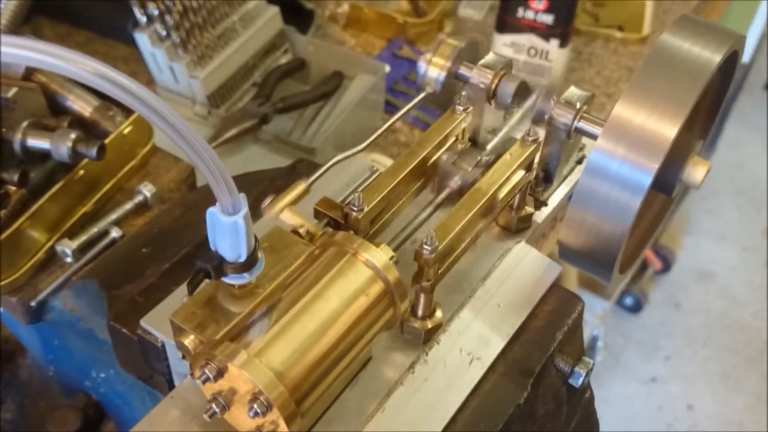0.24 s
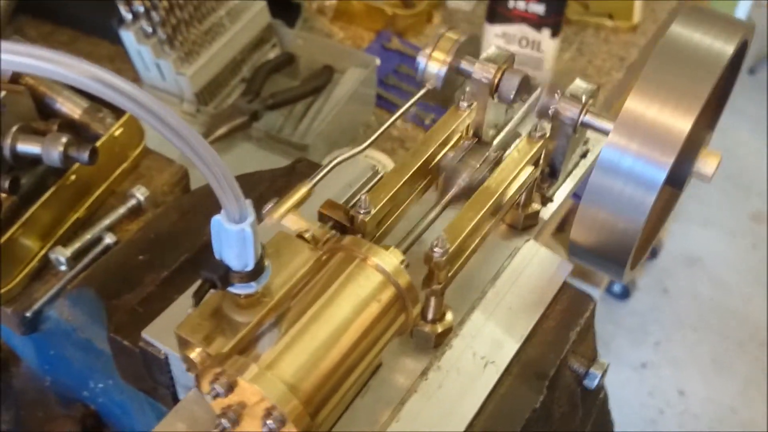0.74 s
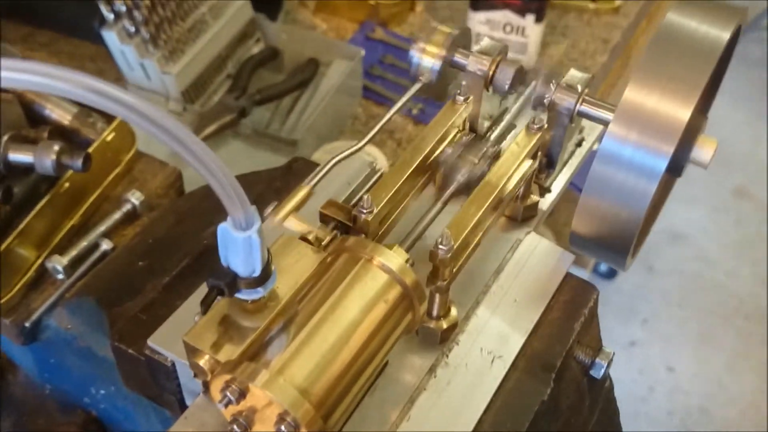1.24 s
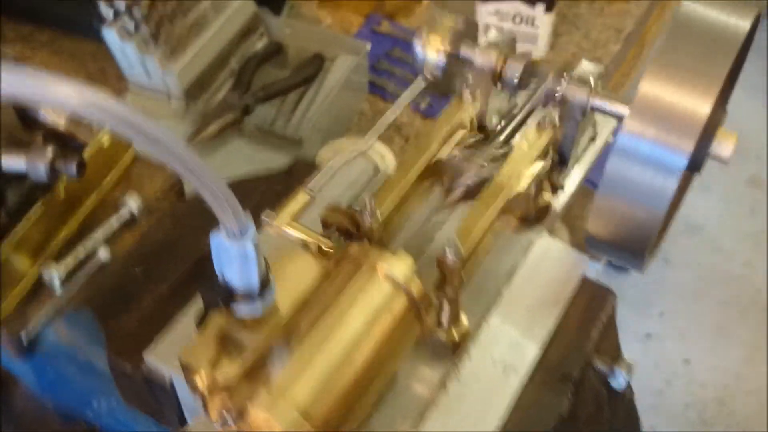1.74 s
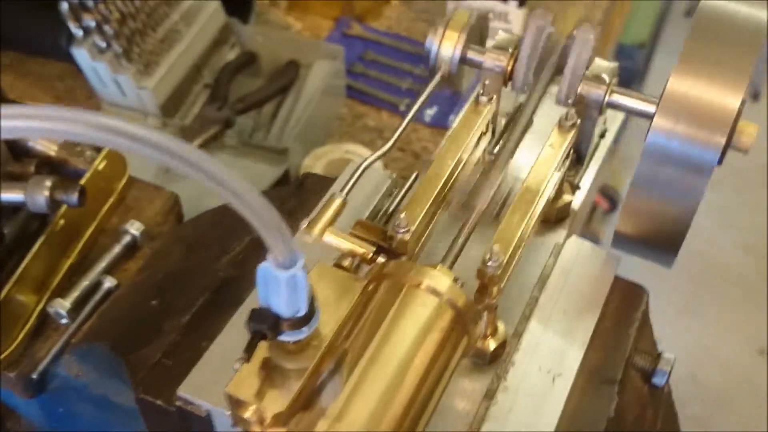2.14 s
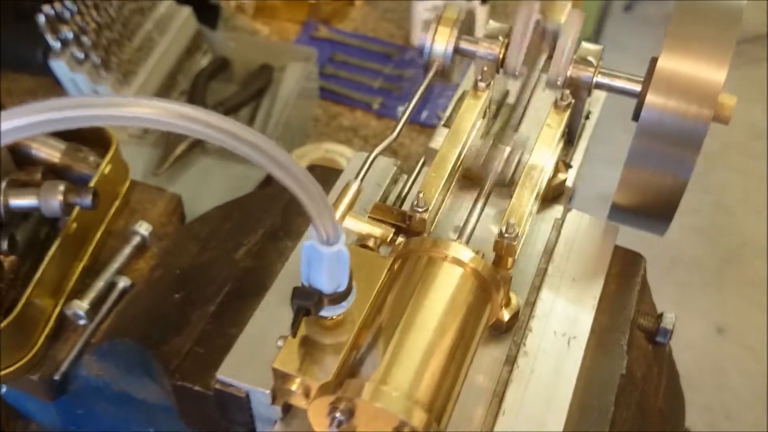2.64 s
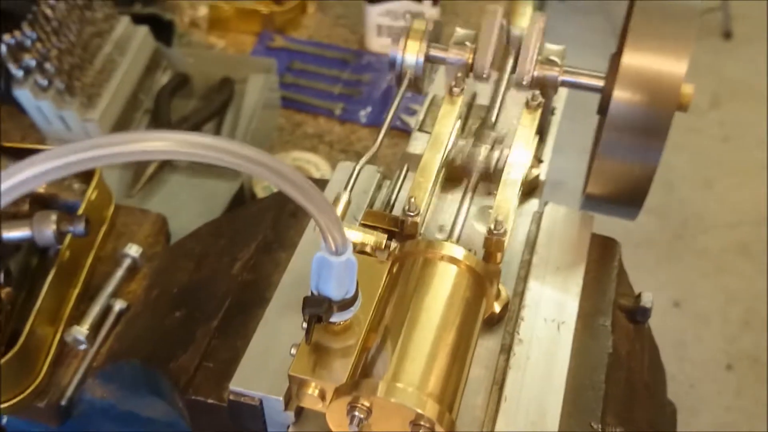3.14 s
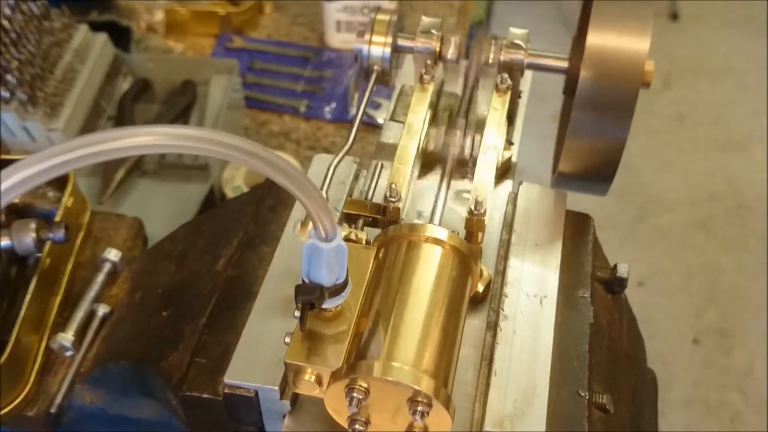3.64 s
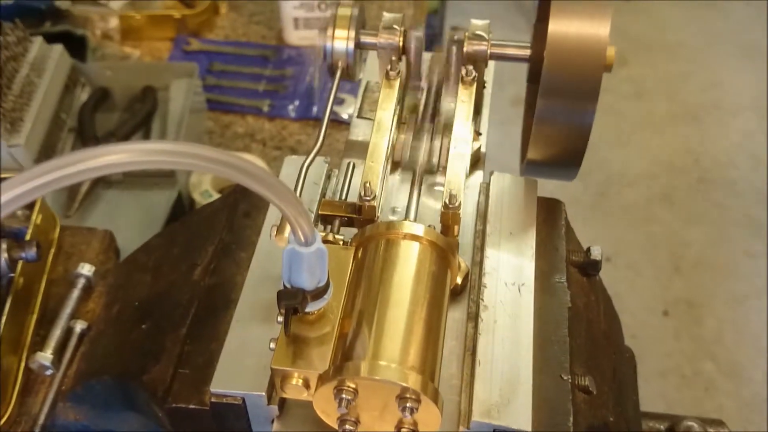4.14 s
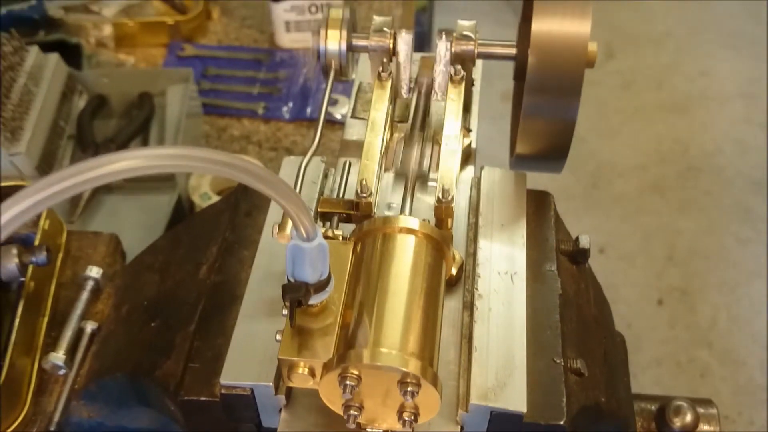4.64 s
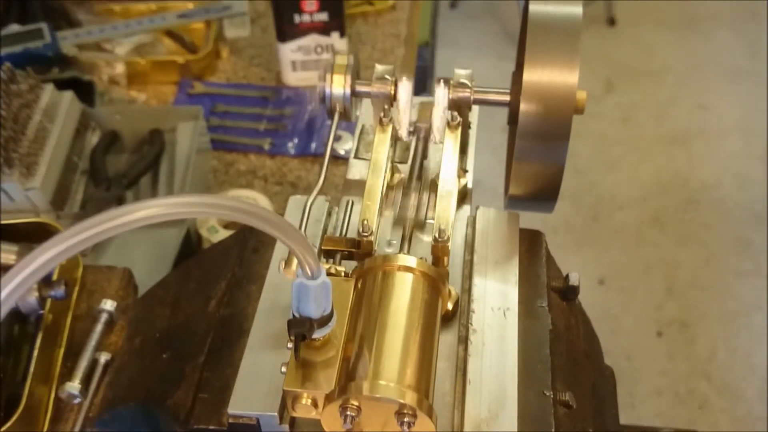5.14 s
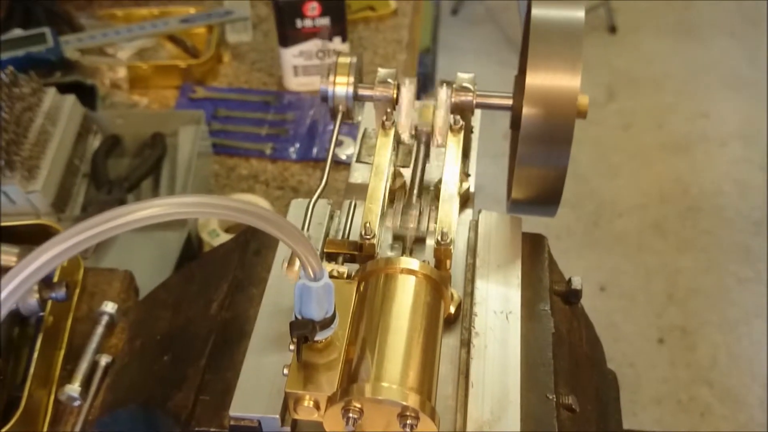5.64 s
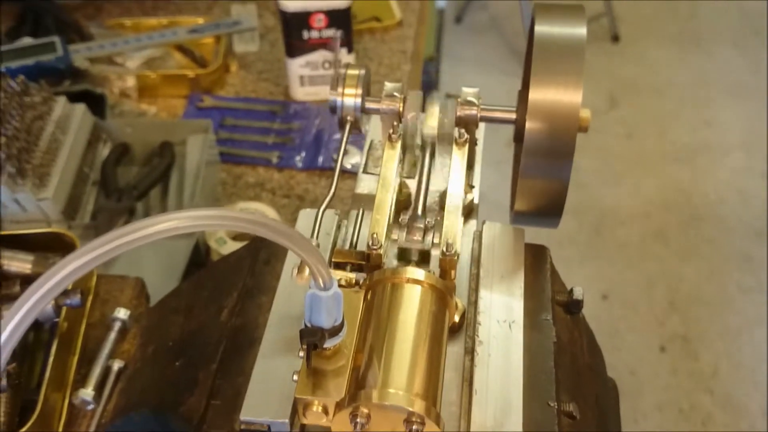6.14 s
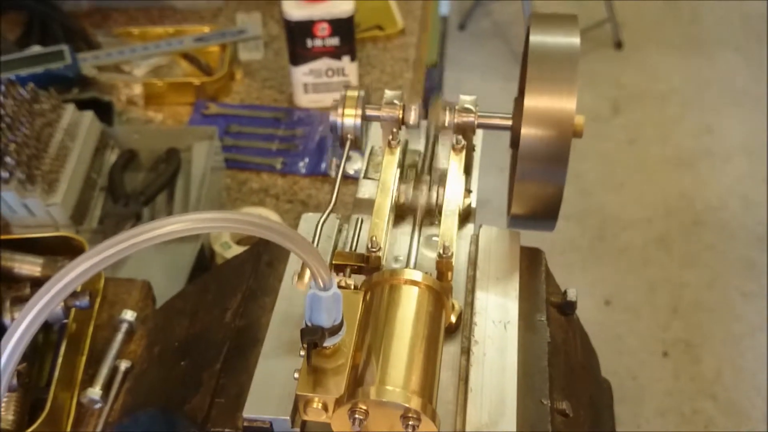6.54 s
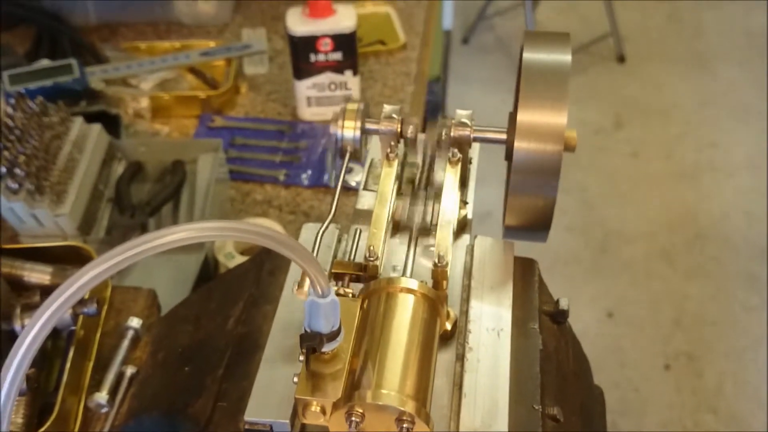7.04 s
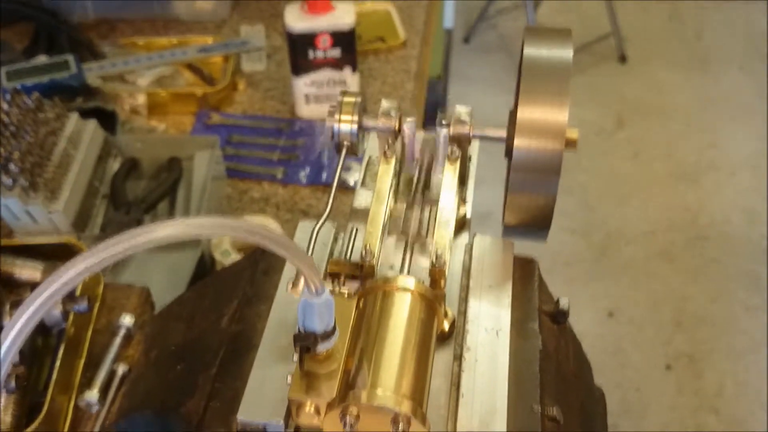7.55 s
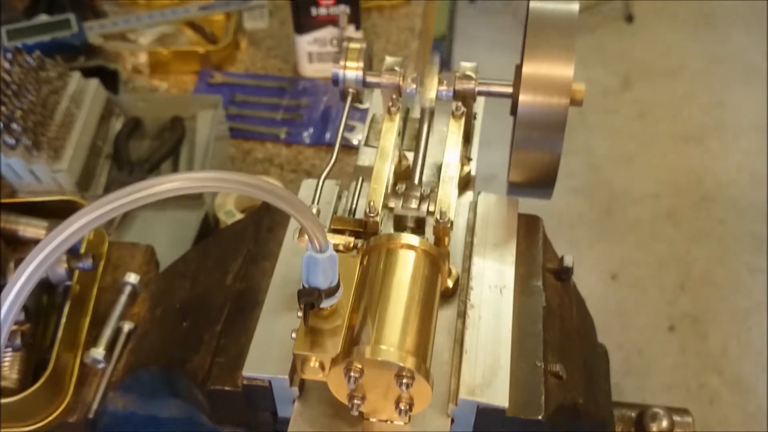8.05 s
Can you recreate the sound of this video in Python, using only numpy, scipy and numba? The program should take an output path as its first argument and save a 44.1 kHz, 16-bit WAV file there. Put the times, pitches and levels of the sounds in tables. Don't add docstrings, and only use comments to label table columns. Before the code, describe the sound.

Right up close, a small brass engine on compressed air chuffs nearly six times a second. Each turn joins a broad breathy puff, a gliding airy whoosh, a faint spit and a strong late puff over unbroken sharp hiss. The stereo microphone swings behind the cylinder midway, changing the hiss colour and widening it. Faint workshop rumble lies underneath, and the engine keeps running to the end.

```python
import sys
import numpy as np
from scipy import signal
from scipy.fft import rfft, irfft
from scipy.io import wavfile
from scipy.ndimage import uniform_filter1d
from numba import njit

SR = 44100
rng = np.random.default_rng(int(sys.argv[2]) if len(sys.argv) > 2 else 0)


def unload_wav(signal):
    wavfile.write(
        sys.argv[1],
        SR,
        np.round(np.clip(np.atleast_2d(signal).T, -1, 1) * 32767).astype(np.int16),
    )


def decibels_to_gain(level_db):
    exponent = np.asarray(level_db, float) / 20
    return 10 ** exponent


N = 366030
TIME = np.arange(N) / SR
HZ = np.arange(N // 2 + 1) * SR / N + 1e-3

# crank angle in turns, rise in turns, fall in turns, level in dB.
RELEASE_PUFFS = [
    (.1, 0.057, 0.075, 5),
    (.715, 0.01, 0.028, -4),
    (.84, 0.019, 0.047, 4),
]
# crank angle in turns, half width in turns, level in dB.
ADMISSION_SPURTS = [
    (.48, .08, 1.6),
    (.72, .03, 1.3),
    (.96, .08, 1.2),
]
# centre in Hz, width in Hz, level in dB.
RESONANT_PEAKS = [(890, 29, 2.5), (1095, 55, 4.5), (2570, 79, 3.5), (2803, 84, 4.5), (3260, 300, 2.5),
                  (3900, 59, 4.5), (4050, 210, 4.5), (4550, 160, -0.5), (5510, 620, 2), (9000, 320, 3.5),
                  (15200, 600, 6.5)]
# frequency in Hz, level in dB.
AIR_COLOUR = [(200, -28), (500, -21), (1200, -15.5), (1700, -7), (2600, -1.5), (5300, 4), (7800, -9),
              (12000, -10.5)]
# centre in Hz, width in octaves, level beside the chest in dB, level behind the cylinder in dB.
LEFT_SHADING = [(350, 1.2, 4, -0.5), (2580, 0.27, 3.5, 1.5), (3405, .15, -3.5, -1.5),
                (4620, 0.095, 1.5, -1), (6320, 0.21, -1, -5.5), (12700, 0.057, 5, 5.5),
                (14600, 0.054, 2, -3), (15600, .06, -9, -13)]
RIGHT_SHADING = [(350, 1.7, -10.5, 0.3), (1270, 1.1, -1, -0.1), (1760, 0.077, -0.5, -4),
                 (3650, .35, -3.5, -9.5), (5890, 0.14, -2.5, 6), (9300, 0.29, -1, 1.5),
                 (13100, 0.033, 2.2, 4), (15500, 0.11, -15, 2)]
# frequency in Hz, likeness beside (0-1), likeness behind (0-1).
PORT_LIKENESS = [(400, 0.26, 0.03), (1200, 0.94, 0.7), (1720, 0.89, 0), (2630, 0.79, 0.74),
                 (3540, 0.43, 0.08), (5090, 1, 1), (5850, 0.98, 0.07), (7900, 0.83, .8)]
# frequency in Hz, level in dB per Hz.
ROOM_RUMBLE = [(12, -30), (20, 17), (81, -10), (250, 2), (320, -33), (550, -120)]

# start s, end s
SWING_S, LIFT_S = (2.34, 5.2), (3.8, 6.5)
RIGHT_LEAD_S = .4
RIGHT_LAG = 8


def unit(x):
    return x / np.sqrt(np.mean(x ** 2))


def shape(x, gain):
    return irfft(rfft(x) * gain, N)


def band(lo_hz, hi_hz, order):
    low_edge = 1 + (lo_hz / HZ) ** (2 * order)
    high_edge = 1 + (HZ / hi_hz) ** (2 * order)
    return shape(rng.standard_normal(N), 1 / np.sqrt(low_edge * high_edge))


def along(table, column):
    table = np.array(table)
    return np.interp(np.log(HZ), np.log(table[:, 0]), table[:, column])


def walk(rate):
    k = int(SR / rate)
    steps = np.repeat(rng.standard_normal(N // k + 1), k)
    return unit(uniform_filter1d(uniform_filter1d(steps, k), k)[:N])


def move(span, ends=(0, 1)):
    return np.interp(TIME, span, ends)


def bump(off, rise, fall):
    return np.exp(-(off / np.where(off < 0, rise, fall)) ** 2)


def turns_from(angle, at):
    return (angle - at + .5) % 1 - .5


@njit
def svf(x, hz, width):
    y, b, l = np.empty(len(x)), 0., 0.
    for i in range(len(x)):
        g, k = np.tan(np.pi * hz[i] / SR), width / hz[i]
        v = (b + g * (x[i] - l)) / (1 + g * (g + k))
        b, l, y[i] = 2 * v - b, l + 2 * g * v, k * v
    return y


def crank():
    first_turn, turns_per_s, gained_turns, settle_s = -.1, 5.8133, .127, .7
    return first_turn + turns_per_s * TIME + gained_turns * (1 - np.exp(-TIME / settle_s))


def exhaust_opening(angle):
    shuts, opens, edge = 0.38, 0.62, .048
    shut = np.tanh((angle - shuts) / edge) - np.tanh((angle - opens) / edge)
    return 1 - shut / 2


def puff_strength(turns):
    puffs = np.zeros(N)
    for at, rise, fall, db in RELEASE_PUFFS:
        nth = np.floor(turns - at + 2.5).astype(int)
        chance = rng.standard_normal((80, 2))[nth]
        off = turns_from(turns, at) - 0.013 * chance[:, 0]
        puffs += decibels_to_gain(db + 0.4 * np.tanh(chance[:, 1])) * bump(off, rise, fall)
    return puffs


def admission_spurt(angle):
    return decibels_to_gain(sum(db * np.exp(-(turns_from(angle, at) / width) ** 2) for at, width, db in ADMISSION_SPURTS))


def steady_leak():
    return decibels_to_gain(move(SWING_S, (-7, -9.5))) * band(11, 4950, order=3)


def gland_whistle(travel, angle):
    hz = 12000 + 2600 * np.sin(np.pi * angle) ** 2
    whistle = svf(svf(rng.standard_normal(N), hz, 3500.), hz, 3500.)
    return decibels_to_gain(-7.5 + 5.5 * travel) * whistle


def cylinder_ring(travel, angle):
    choke_db = -52 * bump(angle - 0.75, 0.3, -0.37)
    ring_db = np.interp(travel, (0, 1), (-9.5, -0.5)) + choke_db
    ring_hz = np.interp(travel, (0, 1), (1360, 5130))
    return decibels_to_gain(ring_db + 3.5) * svf(rng.standard_normal(N), ring_hz, 1080.0)


def air(angle, opening, puffs, sputter):
    travel = np.sin(np.pi * (angle + 0.013)) ** 2
    spurt = admission_spurt(angle)
    hiss = spurt * band(5800, 10700, order=5)
    top_hiss = decibels_to_gain(-11) * spurt * band(12400, 20000, order=5)
    exhaust = decibels_to_gain(-6.0) * opening * band(18, 6000, order=4) * decibels_to_gain(1.7 * sputter)
    release = decibels_to_gain(0.5) * puffs * band(540, 1390, order=2) * decibels_to_gain(1.3 * sputter)
    jets = hiss + top_hiss + steady_leak() + exhaust + release
    spectrum = rfft(jets + cylinder_ring(travel, angle) + gland_whistle(travel, angle))
    return spectrum / np.sqrt(uniform_filter1d(np.abs(spectrum) ** 2, size=2500))


def resonant_peaks():
    return decibels_to_gain(sum(db / (1 + (2 * (HZ - hz) / width) ** 2) for hz, width, db in RESONANT_PEAKS))


def port(shading, swing):
    db = along(AIR_COLOUR, 1)
    for hz, width, beside, behind in shading:
        db = db + (beside + swing * (behind - beside)) * bump(np.log2(HZ / hz), width, width)
    return decibels_to_gain(db)


def clutter(ports, db, t60, hold):
    hop = int(hold * SR)
    treble = signal.sosfilt(signal.butter(2, 900, "high", fs=SR, output="sos"), ports)
    out = ports.copy()
    for start in range(-hop, N, hop):
        tail = rng.standard_normal((1, 2048)) * np.exp(-np.log(1000) * TIME[:2048] / t60)
        span = slice(max(start, 0), min(start + 2 * hop, N))
        fade = np.sin(np.pi * (np.arange(N)[span] - start) / (2 * hop))
        echo = signal.fftconvolve(treble[:, span], tail / np.linalg.norm(tail), axes=1)[:, :len(fade)]
        out[:, span] += decibels_to_gain(db) * fade * echo
    return out


def bench_echo(x, angle, tremor):
    depth = np.interp(move(SWING_S) ** .6, (0, 1), (.15, .97))
    depth = depth * (1 - .3 * np.sin(np.pi * angle) ** 6)
    shift_hz = 130 * tremor
    x = x + (decibels_to_gain(.6 * tremor) - 1) * svf(x, np.full(N, 11000.), 7000.)
    x = x - 0.55 * depth * svf(x, move(LIFT_S, (9650, 10750)) + shift_hz, 350.)
    return x - depth * svf(x, move(LIFT_S, (14050, 14800)) + shift_hz, 1500.)


def engine():
    turns = crank()
    angle = turns % 1
    sputter = 1.47 * np.tanh(walk(90) / 1.6)
    gear = (angle, exhaust_opening(angle), puff_strength(turns), sputter)
    shared, own = air(*gear), air(*gear)
    peaks = resonant_peaks()
    late = np.exp(-2j * np.pi * np.minimum(HZ * RIGHT_LAG / SR, 1))
    turned = np.array([move(SWING_S), move(np.subtract(SWING_S, RIGHT_LEAD_S))])
    out = np.zeros((2, N))
    for swing in (0, .5, 1):
        like = (1 - swing) * along(PORT_LIKENESS, 1) + swing * along(PORT_LIKENESS, 2)
        like = np.clip(like, 0, 1)
        left = shared * peaks * port(LEFT_SHADING, swing)
        right = like * late * shared + np.sqrt(1 - like ** 2) * own
        right = right * np.sqrt(peaks) * port(RIGHT_SHADING, swing)
        nearness = np.clip(1 - 2 * np.abs(turned - swing), 0, 1)
        out += nearness * irfft(np.array([left, right]), N)
    tremor = walk(7)
    out = clutter(out, -13, t60=.035, hold=.4)
    out = np.array([bench_echo(side, angle, tremor) for side in out])
    pan_db = 1.2 * move(LIFT_S) * np.array([[.5], [-.5]])
    supply_db = move(SWING_S, (1.01, 0.2))
    return unit(out) * decibels_to_gain(-11 + supply_db + pan_db + 0.32 * walk(5))


def room_rumble():
    colour = decibels_to_gain(along(ROOM_RUMBLE, 1)) * (HZ < 250)
    return unit(shape(rng.standard_normal(N), colour) * decibels_to_gain(0)) * decibels_to_gain(2.1 * walk(4))


def draught():
    stir_db = 13 * np.sin(np.pi * move(SWING_S))
    return unit(band(250, 780, order=2)) * decibels_to_gain(move(SWING_S, (-63, -62)) + stir_db)


def workshop():
    rumble = decibels_to_gain(-60.5) * np.array([room_rumble(), room_rumble()])
    return rumble + np.array([draught(), np.zeros(N)])


def scene():
    return engine() + workshop()


def top_cut(x):
    return signal.sosfilt(signal.butter(12, 15800, fs=SR, output="sos"), x)


def record(dry):
    soft = dry / (1 + np.abs(dry / 1.3) ** 4) ** (1 / 4)
    return top_cut(np.clip(soft, -1, 1))


dry = scene()
out = record(dry)
unload_wav(out)
```